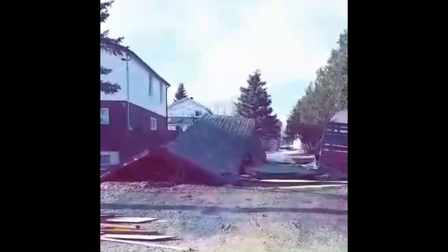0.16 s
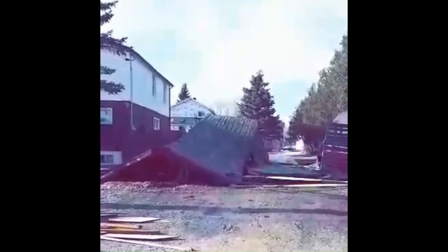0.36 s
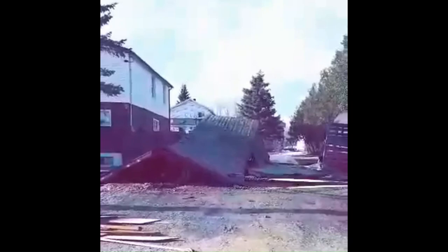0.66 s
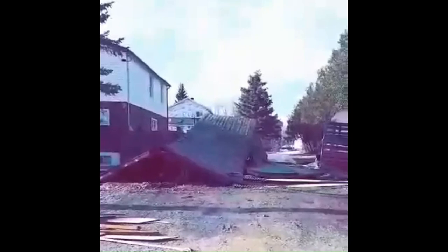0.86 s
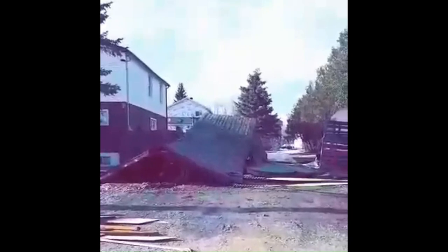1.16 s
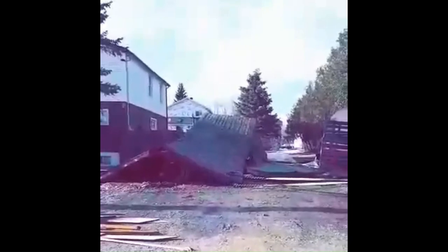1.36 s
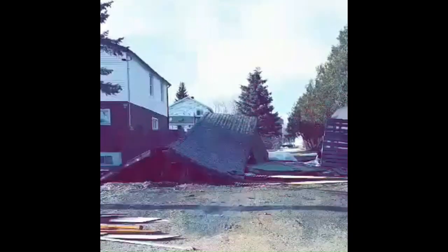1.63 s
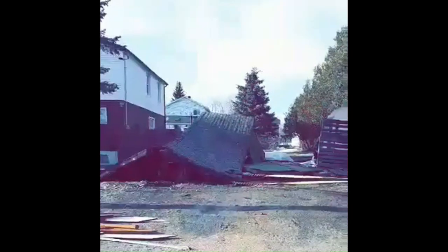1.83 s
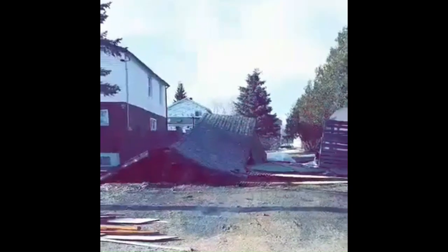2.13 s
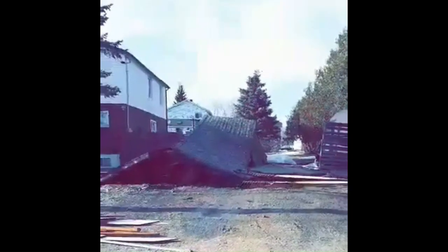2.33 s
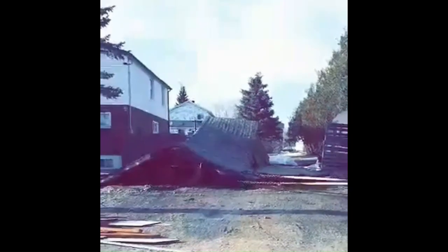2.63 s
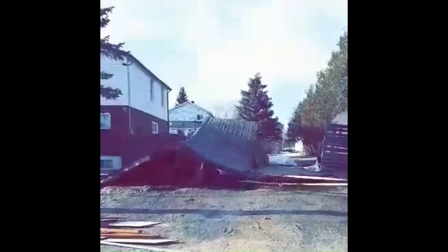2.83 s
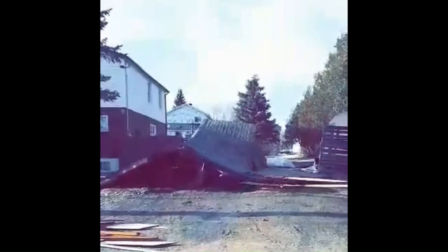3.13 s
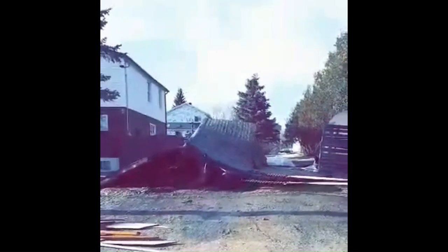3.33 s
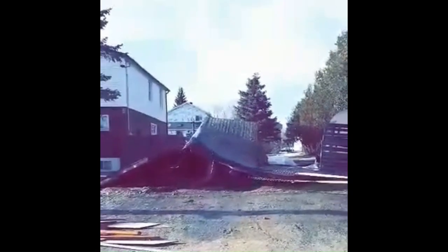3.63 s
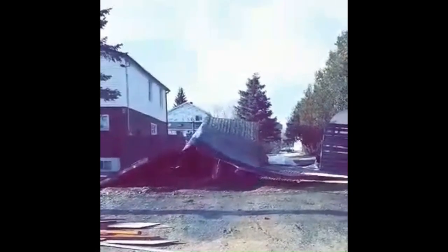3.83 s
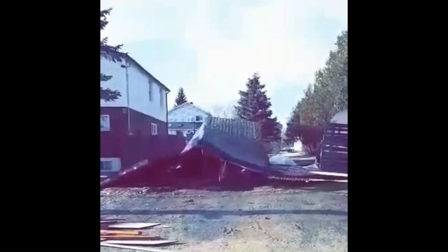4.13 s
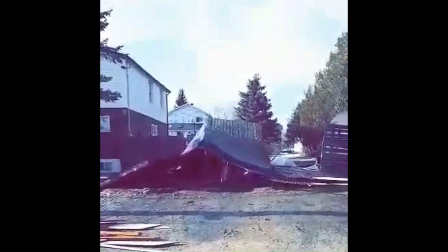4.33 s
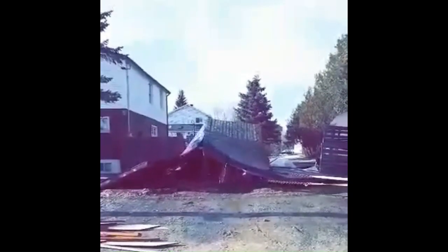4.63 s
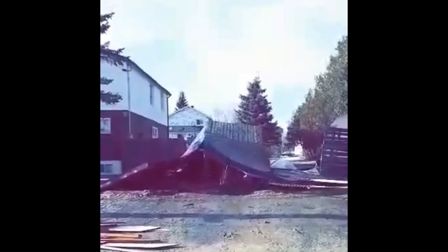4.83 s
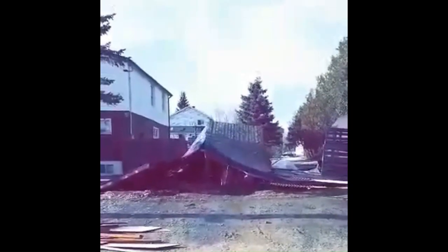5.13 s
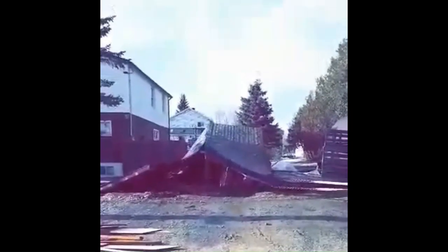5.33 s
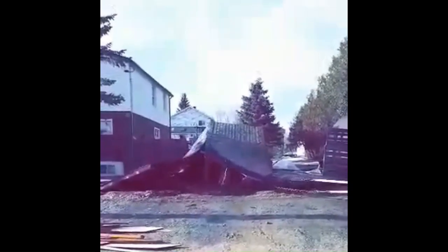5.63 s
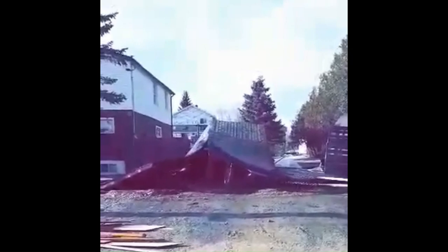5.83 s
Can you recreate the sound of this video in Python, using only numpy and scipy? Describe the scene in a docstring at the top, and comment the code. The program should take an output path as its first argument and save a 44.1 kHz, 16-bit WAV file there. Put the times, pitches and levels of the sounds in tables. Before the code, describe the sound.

A pickup truck drags down a rotten wooden garage. Dull, dry cracks and soft panel booms open over a burbling idle; three engine surges follow, the last the highest. Between them come dense splitting, a few short metallic clanks, a long crackling slide of wreckage and scattered board snaps, quieting briefly before the final scrape. Open yard, one faint wall slap and a thin dull tail, heard on a phone from one spot.

```python
"""Pickup dragging down a wooden garage

A V8 pickup revs three times: wavering sine orders of its firing cycle, with filtered noise for gas and fan.
Rotten timbers split and boards snap, as bursts of random clicks exciting damped wooden modes.
Panels thud and a steel fitting clanks as decaying modes, while sliding wood grinds, crackles and ticks.
The house wall and the yard return the sounds of the falling garage as an echo and a diffuse tail."""
import sys
import numpy as np
from scipy import signal
from scipy.fft import rfft, irfft
from scipy.io import wavfile
from scipy.ndimage import uniform_filter1d

SR = 44100
rng = np.random.default_rng(int(sys.argv[2]) if len(sys.argv) > 2 else 0)


def digitize_waveform(pressure):
    """Quantize a signal to 16-bit integers and store it at the path in sys.argv[1].

    Rows of a 2-D input are taken as channels; values are limited to [-1, 1].
    """
    field = np.atleast_2d(pressure).T
    bounded = np.clip(field, -1, 1)
    quanta = np.round(bounded * 32767).astype(np.int16)
    wavfile.write(sys.argv[1], SR, quanta)


N = 264159
TIME = np.arange(N) / SR


def undb(db):
    """Level to amplitude: 20 dB is a factor of ten."""
    return 10 ** (np.asarray(db) / 20)


def unit(x):
    """Power normalisation: scale to rms 1."""
    return x / np.sqrt(np.mean(x ** 2))


def peak(x):
    """Short-time normalisation: a sine as strong as the loudest 3 ms would peak at 1."""
    return x / np.sqrt(2 * uniform_filter1d(x ** 2, size=128).max())


def curve(table, column=1):
    """Linear interpolation of one table column over time."""
    rows = np.array(table)
    return np.interp(TIME, rows[:, 0], rows[:, column])


def fade(t, t60):
    """Exponential decay, falling 60 dB in t60 seconds."""
    return np.exp(-np.log(1000) * t / t60)


def walk(rate):
    """Random modulation: straight lines between normal draws, rate per second, with a spread near 1."""
    count = int(rate * N / SR) + 2
    return 1.2 * np.interp(TIME * rate, np.arange(count), rng.standard_normal(count))


def clicks(count, rate, spread_db):
    """Random impulses, rate per second on average, most small and a few large."""
    size = undb(spread_db * np.minimum(rng.exponential(size=count), 4))
    return (rng.random(count) < rate / SR) * size * rng.choice([-1, 1], count)


def add(out, s, x):
    """Superposition: mix x in from time s."""
    start = max(int(s * SR), 0)
    out[start:start + len(x)] += x[:max(N - start, 0)]


def colour(x, points):
    """Minimum-phase filtering with the given (Hz, dB) outline, built by folding the cepstrum."""
    size = 4096
    hz, db = np.transpose(points)
    bins = np.maximum(np.fft.rfftfreq(size, 1 / SR), 1)
    outside_octaves = np.abs(np.log2(bins / np.clip(bins, hz[0], hz[-1])))
    gain_db = np.interp(np.log(bins), np.log(hz), db) - 18 * outside_octaves
    cepstrum = irfft(np.log(undb(gain_db)))
    cepstrum[1:size // 2] *= 2
    cepstrum[size // 2 + 1:] = 0
    impulse_response = irfft(np.exp(rfft(cepstrum)))
    return signal.fftconvolve(x, impulse_response)[:len(x)]


# the engine is louder the faster it turns, and louder still while it runs ahead of its recent speed
IDLE_HZ, IDLE_DB, RECENT_S = 43, -32.5, 0.86
SPEED_DB_PER_OCTAVE, THROTTLE_DB_PER_OCTAVE = 8.5, 8.5
NEARING_DB_PER_S = 0.3762  # the truck creeps closer as it pulls


def throttle(speed):
    """Source power: level in dB from nearness, engine speed and how hard that is picking up."""
    octaves = np.log2(speed / IDLE_HZ)
    step = 1 / (RECENT_S * SR)
    recent = signal.lfilter([step], [1, step - 1], octaves)
    level_db = IDLE_DB + NEARING_DB_PER_S * TIME + SPEED_DB_PER_OCTAVE * octaves
    return level_db + THROTTLE_DB_PER_OCTAVE * (octaves - recent)


# Engine speed. Each row: time in seconds, firing rate in Hz.
ENGINE_SPEED = [(0, 43.36), (1.2, 43.12), (1.31, 53.4), (1.6, 67.1), (1.85, 68.4), (2.1, 66.33),
                (2.7, 59.23), (3.2, 72.65), (3.5, 76.83), (3.8, 72.7), (4.28, 52.96), (4.45, 39.5),
                (5.18, 45.03), (5.57, 78.84), (5.78, 85.4), (5.99, 71.7)]
# Engine orders over a cycle of eight firings, the pattern repeating every eight. # Each entry: level in dB; the
# first is for multiples of the firing rate, # and orders 5 to 7, below the firing rate, are the burble of
# uneven banks.
ORDER_LEVELS = [3.5, -5, -7.5, -2, -12.5, 0.5, -0.5, -7.5]
# Exhaust pipe and silencer response. Each row: frequency in Hz, gain in dB.
EXHAUST_RESPONSE = [(37, -33), (43.5, 4.5), (52, 1.5), (59, -8.5), (68, -5), (81, 0.5), (93, -2.5),
                    (107, 0), (123, -16), (139, 2.5), (163, 2), (188, 5), (215, -4.5), (270, -10.5),
                    (420, -10)]
# Spectrum of the rushing exhaust gas. Each row: frequency in Hz, relative level in dB.
GAS_SPECTRUM = [(60, -10.5), (78, -5), (120, -10.5), (170, -0.5), (240, -1.5), (310, -4), (420, -1.5),
                (520, -15.5), (700, -45.5)]
# Spectrum of fan and valve gear. Each row: frequency in Hz, relative level in dB.
MACHINERY_SPECTRUM = [(500, -7), (850, 0), (1200, -9.5), (2100, -6), (3200, -23.5), (7700, -19.5),
                      (10000, -31.5)]


def truck(orders_db=-2.5, burble_db=-15.0, bark_db_per_hz=0.44, bark_hz=72, machinery_db=-28):
    """Periodic source: pipe and house walls smear firings into wavering orders; gas rushes, fan and valves hiss."""
    speed, cylinders = curve(ENGINE_SPEED), len(ORDER_LEVELS)
    waver, gas_db = .08, -9.5
    # near full revs the firings themselves bark out over the burble
    bark_db = bark_db_per_hz * np.maximum(speed - bark_hz, 0)
    cycle = 2 * np.pi * np.cumsum(speed) / SR / cylinders
    pipe_hz, pipe_db = np.transpose(EXHAUST_RESPONSE)
    drone = np.zeros(N)
    for order in range(5, 44):
        order_db = ORDER_LEVELS[order % cylinders]
        if order < cylinders:
            order_db = order_db + burble_db  # below the firing rate, sound radiates poorly
        if order in (cylinders, 2 * cylinders):
            order_db = order_db + bark_db
        phase = order * cycle + 2 * np.pi * rng.random() + waver * order / cylinders * walk(14)
        pipe_gain = np.interp(order * speed / cylinders, pipe_hz, undb(pipe_db))
        drone += undb(order_db) * pipe_gain * np.sin(phase)
    puff = 1 + .5 * np.cos(cylinders * cycle)
    high_pass = signal.butter(3, 70, "high", fs=SR, output="sos")
    gas = signal.sosfilt(high_pass, puff * rng.standard_normal(N))
    lope = undb(1.3 * walk(16))
    exhaust = lope * undb(orders_db) * unit(drone) + undb(gas_db) * unit(colour(gas, GAS_SPECTRUM))
    machinery = unit(colour(rng.standard_normal(N), MACHINERY_SPECTRUM))
    return undb(throttle(speed)) * (exhaust + undb(machinery_db) * machinery)


def board(push, ring_t60, ring_db, count=24, smallness=1):
    """Modal resonance: each piece of wood has its own quickly damped modes, higher the smaller it is."""
    t = TIME[:SR // 20]
    hz = smallness * np.exp(rng.uniform(np.log(600), np.log(4200), (count, 1)))
    modes = np.sin(2 * np.pi * hz * t) * rng.choice([-1, 1], (count, 1))
    ring = modes.sum(axis=0) * fade(t, ring_t60)
    return push + undb(ring_db) * signal.fftconvolve(push, ring / np.linalg.norm(ring))[:len(push)]


# Bending modes of a board. Each row: multiple of the lowest mode, level in dB before random variation.
BENDING_MODES = [(1, 6.5), (1.61, -5), (2.45, -7.5), (3.05, 2), (3.54, -18)]
BOARD_CYCLES = 44  # each mode falls 60 dB within this many of its cycles


def plank(push, hz, dull_hz=3400):
    """Bending vibration: a push rings modes above a lowest at hz; no two boards are alike, and rot dulls them."""
    t = TIME[:SR // 10]
    ring = np.zeros(len(t))
    for ratio, db in BENDING_MODES:
        mode_hz = hz * ratio ** rng.normal(1, .02)
        gain = undb(db + 2 * rng.standard_normal())
        ring += gain * np.sin(2 * np.pi * mode_hz * t) * fade(t, BOARD_CYCLES / mode_hz)
    ring = signal.sosfilt(signal.butter(4, dull_hz, fs=SR, output="sos"), ring)
    return signal.fftconvolve(push, ring)[:len(push)]


# Colour of wood. Each row: frequency in Hz, breaking timber in dB, sliding wreck in dB.
WOOD_COLOUR = [(148, -3.5, -4.5), (390, 12.5, 13.5), (588, -16.5, -4), (848, 1.5, 3.5), (1110, -6.5, -4.5),
               (1516, 4, -2.5), (1854, -6.5, -9.5), (2220, -1.5, -3.5), (3390, -5, -10.5), (4460, -16, -36),
               (7300, -23.5, -34)]
# Colour of splinters, chips and grit. Each row: frequency in Hz, relative level in dB.
SPLINTER_COLOUR = [(2200, 2.5), (4000, 3.5), (5300, 1.5), (6600, -1.5), (7700, 2.5), (9500, -7),
                   (12500, -0.5), (14500, -8.5)]
# soft, rotten wood knocks dully: the CRISP_HZ part of its top edge drops an octave for so many dB
CRISP_HZ, DULLING_DB_PER_OCTAVE = 11200, 14
TOP_HZ = 14100  # highest edge of the knock, and the cutoff of record()


def fracture(envelope, hz, treble_db, ring_db, body_db, below_hz=420):
    """Cascading failure: fibres give way one after another, ring the board and tick as fine splinters."""
    fibres = clicks(len(envelope), rate=6000, spread_db=2.5) * envelope
    fibres[0] = .7 * np.abs(fibres).max() * envelope[0] / envelope.max()  # the first fibre
    wood = colour(board(fibres, ring_t60=0.013, ring_db=ring_db), np.array(WOOD_COLOUR)[:, :2])
    # a board radiates little below its lowest mode
    top_hz = min(CRISP_HZ * 2 ** (treble_db / DULLING_DB_PER_OCTAVE) + hz / 2, TOP_HZ)
    band = signal.butter(3, [hz - below_hz, top_hz], "band", fs=SR, output="sos")
    wood = signal.sosfilt(band, wood)
    splinters = colour(board(fibres, ring_t60=.015, ring_db=-1, smallness=3), SPLINTER_COLOUR)
    knock = peak(peak(wood) + undb(body_db) * peak(plank(fibres, hz)))
    return knock + undb(treble_db) * peak(splinters)


# Timbers splitting. Each row: start in seconds, knock peak in dB, splinters relative to it in dB,
# time before the tear dies away in seconds.
TIMBER_SPLITS = [(0.034, -12.5, -16.5, 0.02), (0.063, -18.5, -16, 0.018), (0.158, -15, -16, 0.053),
                 (0.188, -17, -24, 0.043), (0.704, -17.5, -16.5, 0.01), (1.713, -10.5, -17.5, 0.012),
                 (1.778, -13, -12.5, 0.028), (1.831, -13, -9, 0.018), (2.034, -20, -26, 0.015),
                 (2.058, -14.5, -14.5, 0.015), (2.094, -15, -17, 0.032), (2.171, -15, -15, 0.04),
                 (2.228, -13.5, -15, 0.031), (2.262, -12.5, -13.5, 0.025), (4.164, -21, -13.5, 0.012),
                 (4.177, -15, -21, 0.014)]
SPLIT_HZ = 965  # lowest mode of the frame timbers, before random variation
# Boards snapping; the row at 0.738 s is the split at 0.704 s slapping back from the house wall. Each row: start
# in seconds, knock peak in dB, splinters relative to it in dB, lowest mode in Hz.
BOARD_SNAPS = [(0.31, -28, -15, 1135), (0.402, -14, -12, 1397), (0.455, -39, -2, 750),
               (0.568, -29.5, -4.5, 1430), (0.65, -22, 3.5, 1900), (0.738, -19.5, -22, 1754),
               (1.67, -24.5, -2.5, 1030), (1.754, -16, -3.5, 1430), (1.8, -21, 1.5, 1480),
               (2.349, -20.5, -47, 797), (2.419, -28, -3.5, 905), (2.639, -23, -7, 847),
               (2.679, -28, -7.5, 810), (2.758, -23, -15, 1280), (2.821, -29.5, -1.5, 1000),
               (2.909, -24.5, -8, 764), (2.936, -37, 2.5, 1026), (3.059, -30, -4, 755.7),
               (3.157, -26.5, -12, 894), (3.224, -20.5, -2.5, 983), (3.248, -18, -3.5, 977),
               (3.356, -27, -4.5, 1500), (3.422, -33.5, 0.5, 894), (3.516, -19, -18, 1358),
               (3.587, -24, -17, 1470), (3.601, -32, -16, 884), (3.617, -27.5, -24, 1010),
               (3.675, -30.5, -16, 3400), (3.748, -21.5, -6.5, 1180), (3.779, -21, -7, 1423),
               (3.8, -25, -25, 890), (3.837, -25.5, -13, 767), (3.872, -16.5, -8, 1360),
               (3.913, -24, -6, 1050), (3.97, -22, -8, 830), (4.033, -22.5, -17, 787),
               (4.093, -29.5, -23, 783), (4.3, -27.5, -13, 1404), (5.177, -24, -16, 2520),
               (5.272, -26, -30, 765), (5.336, -20.5, -9, 754), (5.399, -29.5, -9, 931),
               (5.887, -15, -6, 804.3), (5.948, -21, -9.5, 770)]


def timbers(split_rise=0.0014, jolt_t60=0.023, snap_t60=0.0067, crumble_db=-11, split_body_db=-7, snap_body_db=-5):
    """Crack growth: a split tears on in uneven jolts; a snap ends at once, crumbling longer in a low board."""
    out, t = np.zeros(N), TIME[:SR // 5]
    tear_t60, crumble_cycles = .11, 165
    for s, db, treble_db, length in TIMBER_SPLITS:
        slips = (rng.random(len(t)) < 110 / SR) * rng.random(len(t))
        slips[0] = 0.65
        jolts = .5 + signal.fftconvolve(slips, fade(t, jolt_t60))[:len(t)]
        tear = jolts * fade(np.maximum(t - length, 0), tear_t60) * (1 - np.exp(-t / split_rise))
        hz = SPLIT_HZ * rng.normal(1, 0.038)
        add(out, s, undb(db) * fracture(tear, hz, treble_db, ring_db=-6, body_db=split_body_db))
    for s, db, treble_db, hz in BOARD_SNAPS:
        burst = fade(t, snap_t60) + undb(crumble_db) * fade(t, crumble_cycles / hz)
        add(out, s, undb(db) * fracture(burst, hz, treble_db, ring_db=-1, body_db=snap_body_db))
    return out


# Walls and roof thudding. Each row: start in seconds, peak in dB, pitch in Hz.
PANEL_THUDS = [(0.109, -16.5, 272), (0.195, -12.5, 262), (1.693, -17.5, 227), (2.643, -18.5, 310.7),
               (3.784, -13, 232), (3.831, -11.5, 216), (3.974, -15.5, 341), (4.091, -17.5, 235),
               (5.242, -15, 268), (5.274, -11.5, 292), (5.898, -17.5, 324)]


def thuds(t60=0.12, rise=0.0023, spread=0.236, count=6):
    """Plate vibration: large panels land softly and boom in a cluster of low modes."""
    out, t = np.zeros(N), TIME[:SR // 3]
    for s, db, hz in PANEL_THUDS:
        modes_hz = hz * np.exp(spread * rng.standard_normal((count, 1)))
        modes = np.sin(2 * np.pi * (modes_hz * t + rng.random((count, 1))))
        boom = np.sin(2 * np.pi * hz * t) + .5 * modes.sum(axis=0)
        add(out, s, undb(db) * peak(boom * fade(t, t60) * (1 - np.exp(-t / rise))))
    return out


# Blows on a steel fitting. Each row: start in seconds, level in dB.
STEEL_BLOWS = [(1.784, -19.5), (2.101, -16), (2.177, -15.5), (2.24, -14)]
# Modes of the fitting. Each row: frequency in Hz, level in dB before random variation, 60 dB decay in seconds.
STEEL_MODES = [(966, 0.5, 0.13), (1320, -8.5, 0.16), (1770, -6.5, 0.12), (2214, -13, 0.28),
               (2770, -17, 0.19), (3530, -26, 0.18), (7800, -43, 0.16)]


def fitting(contact=0.00069):
    """Modal ringing: a piece of steel sounds the same mode frequencies at each wrench."""
    out, t = np.zeros(N), TIME[:SR // 2]
    for s, blow_db in STEEL_BLOWS:
        ring = np.zeros(len(t))
        for hz, db, t60 in STEEL_MODES:
            gain = undb(db + 2 * rng.standard_normal())
            ring += gain * np.sin(2 * np.pi * (hz * t + rng.random())) * fade(t, t60)
        add(out, s, undb(blow_db) * ring * (1 - np.exp(-t / contact)))
    return out


# The long slide of the whole wreck. Each row: time in seconds, level in dB, grit relative to that level in dB.
WRECK_SLIDE = [(1.3, -87, -7), (1.5, -43.5, -12.5), (1.72, -31.5, -11.5), (1.86, -32.5, -13),
               (1.97, -36, -9.5), (2.3, -31.5, -19), (2.62, -36.5, -15), (3.29, -38.5, -9.5),
               (3.66, -34, -10.5), (3.92, -26.5, -16), (4.1, -40, -7.5), (4.25, -37, -15.5),
               (4.5, -56, -17)]
SLIDE_EDGE_DB_PER_S = 90


def slide_db():
    """Sliding friction: level of the long slide, which dies away beyond both its ends."""
    outside_s = np.abs(TIME - np.clip(TIME, WRECK_SLIDE[0][0], WRECK_SLIDE[-1][0]))
    return curve(WRECK_SLIDE) - SLIDE_EDGE_DB_PER_S * outside_s


# Single boards scraping. Each row: start in seconds, time before dying away in seconds, level in dB,
# grit relative to that level in dB.
BOARD_SCRAPES = [(-0.05, 0.052, -28, -16), (0.36, 0.12, -29.5, -12.5), (2.494, 0.039, -34.5, -14.5),
                 (4.375, 0.013, -34.5, -15), (4.68, 0.14, -47.5, -2), (4.865, 0.025, -50.5, -7),
                 (5.185, 0.14, -37.5, -13.5), (5.812, 0.023, -33, -4), (5.40, 0.66, -45.5, -7.5),
                 (5.848, 0.11, -32.5, -13)]
SCRAPE_ATTACK_S, SCRAPE_T60_S = 0.022, 0.47
# every split sheds debris that trickles away, this far under its peak; the wreck never quite rests
DEBRIS_DB, DEBRIS_T60_S, DEBRIS_GRIT_DB = -26, 0.98, -10.5
CREEP_DB, CREEP_GRIT_DB = -67, -3.5


def movement():
    """Incoherent addition: slide, scrapes, debris and creep add in power, for crackle and for grit."""
    parts = [(undb(slide_db()), curve(WRECK_SLIDE, 2)), (undb(CREEP_DB), CREEP_GRIT_DB)]
    for s, length, db, grit_db in BOARD_SCRAPES:
        attack = np.clip((TIME - s) / SCRAPE_ATTACK_S, 0, 1)
        stroke = attack * fade(np.maximum(TIME - s - length, 0), SCRAPE_T60_S)
        parts.append((undb(db) * stroke, grit_db))
    debris_power, trickle = np.zeros(N), fade(TIME[:SR], DEBRIS_T60_S)
    for s, db, *_ in TIMBER_SPLITS:
        add(debris_power, s, (undb(db + DEBRIS_DB) * trickle) ** 2)
    parts.append((np.sqrt(debris_power), DEBRIS_GRIT_DB))
    crackle_power = sum(gain ** 2 for gain, _ in parts)
    grit_power = sum((gain * undb(grit_db)) ** 2 for gain, grit_db in parts)
    return np.sqrt(crackle_power), np.sqrt(grit_power)


def clatter(smallness, count=1400):
    """Random impacts: loose pieces knock together, each with its own ring; small ones ring higher and shorter."""
    out, t = np.zeros(N), TIME[:SR // 20]
    for s in rng.uniform(0, N / SR, size=count):
        contact = clicks(len(t), rate=4000, spread_db=1.5) * fade(t, .04)
        knock = board(contact, ring_t60=.04 / smallness, ring_db=2, count=6, smallness=smallness)
        add(out, s, undb(rng.uniform(-14, 0)) * knock)
    return out


def rubble(outline, smallness):
    """Granular contact: fine grinding with clattering pieces on top."""
    grains = clicks(N, rate=6000, spread_db=2.5)
    return .7 * (unit(colour(grains, outline)) + unit(colour(clatter(smallness), outline)))


def sliding():
    """Jerky friction: boards grind over each other while loose pieces clack; chips and grit tick above."""
    crackle_gain, grit_gain = movement()
    jerks = undb(2 * walk(50))
    crackle = rubble(np.array(WOOD_COLOUR)[:, ::2], smallness=1) * crackle_gain
    grit = rubble(SPLINTER_COLOUR, smallness=3) * grit_gain
    return jerks * (crackle + grit)


def yard(x, wall_s=.031, wall_db=-18, tail_db=-15, dull_hz=4500):
    """Reflection and scattering: one slap from the house wall and a thin, dull tail from fences and trees."""
    t = TIME[:SR]
    tail_t60 = .55
    echo = rng.standard_normal(SR) * fade(t, tail_t60)
    echo *= undb(tail_db) / np.linalg.norm(echo)
    echo[int(wall_s * SR)] += undb(wall_db)
    echo = signal.sosfilt(signal.butter(2, dull_hz, fs=SR, output="sos"), echo)
    return x + signal.fftconvolve(x, echo)[:N]


def scene():
    """Superposition: the truck and the falling garage, heard from one spot."""
    garage = timbers() + thuds() + fitting() + sliding()
    return (truck() + yard(garage))[None]


def record(dry):
    """Saturation and band limiting: the phone rounds the loudest peaks and cuts the top."""
    ceiling = .7
    rounded = ceiling * np.tanh(dry / ceiling)
    return signal.sosfilt(signal.ellip(10, .2, 80, TOP_HZ, fs=SR, output="sos"), rounded)


dry = scene()
out = record(dry)
digitize_waveform(out)
```